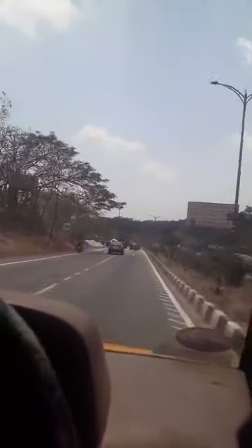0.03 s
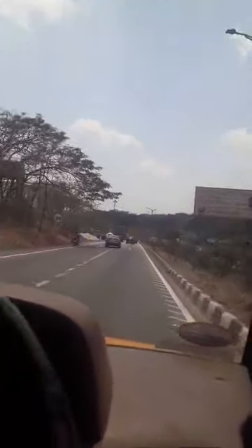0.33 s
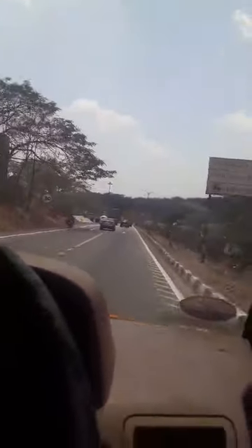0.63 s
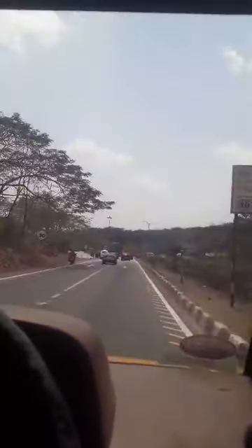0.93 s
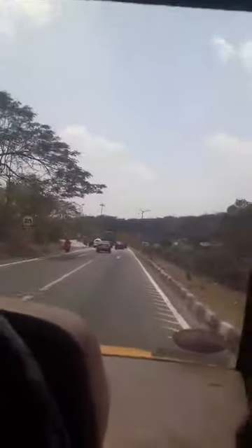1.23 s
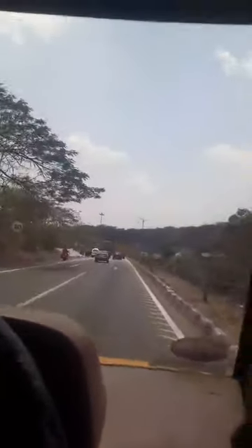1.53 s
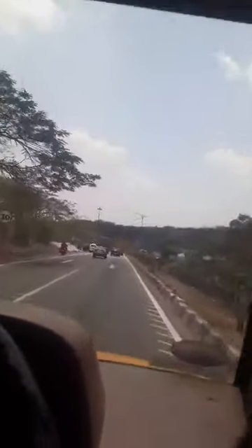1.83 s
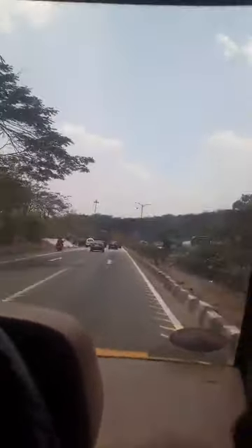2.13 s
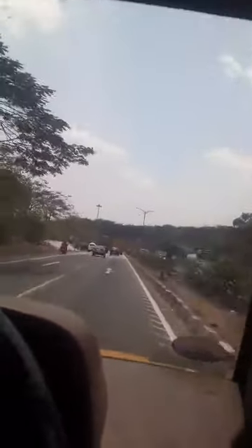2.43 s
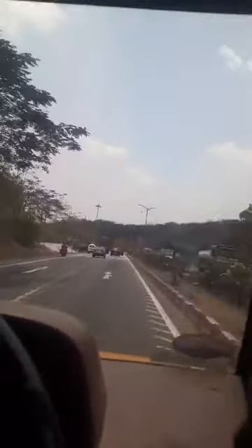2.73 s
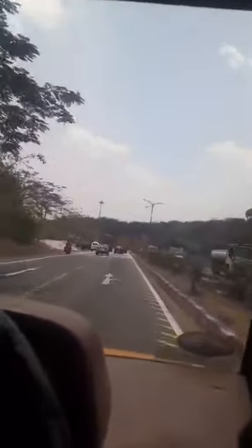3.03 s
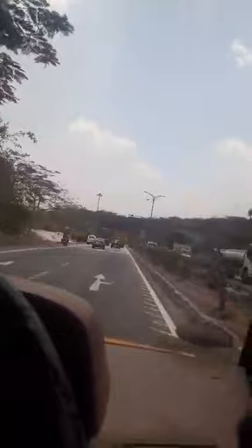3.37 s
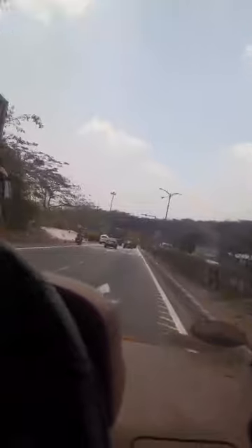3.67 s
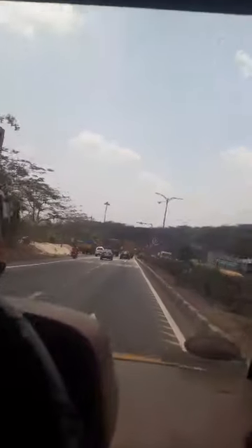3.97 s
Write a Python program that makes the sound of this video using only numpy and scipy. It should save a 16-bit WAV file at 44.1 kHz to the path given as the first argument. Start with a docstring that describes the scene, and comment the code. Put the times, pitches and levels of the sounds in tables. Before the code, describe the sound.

Tyres cross rumble strips in a quick train of thumps and trim rattles, heard from a vehicle's front seat. Steady road roar, engine drone and wind come before and carry on afterwards, a little quieter.

```python
"""Rumble strips from inside a vehicle

Tyre roar, cabin boom, engine drone and wind hiss at road speed. The tyres cross a run of rumble
strips, about 15 a second. Each strip thumps the body and shakes the loose trim into a short
rattle; the trim squeaks now and then and a small metal part rings."""
import sys
import numpy as np
from scipy import signal
from scipy.io import wavfile
from scipy.ndimage import uniform_filter1d

SR = 44100
rng = np.random.default_rng(int(sys.argv[2]) if len(sys.argv) > 2 else 0)


def master(y):
    """Save y as 16-bit WAV."""
    cut = np.clip(np.atleast_2d(y).T, -1, 1)
    pcm = np.round(cut * 32767)  # scale
    wavfile.write(sys.argv[1], SR, pcm.astype(np.int16))


N = 176400


def amp(db):
    """Decibels to gain."""
    return 10 ** (np.asarray(db) / 20)


def unit_rms(x):
    """Scales to rms 1."""
    return x / np.sqrt(np.mean(x ** 2) + 1e-20)


def curve_at(points, hz):
    """Interpolates a table on a log-frequency axis."""
    point_hz, value = np.transpose(points)
    return np.interp(np.log(hz + 1), np.log(point_hz + 1), value)


def resonance_db(modes, hz):
    """Boost from resonant modes at each frequency."""
    return sum(db / (1 + (2 * (hz - mode_hz) / width_hz) ** 2) for mode_hz, width_hz, db in modes)


def since(start_s):
    """Seconds since the start, zero before it."""
    return np.maximum(np.arange(N) / SR - start_s, 0)


def burst(start_s, rise_s, hold_s, t60_s):
    """Linear rise, then exponential decay from hold_s after the start."""
    t = since(start_s)
    return np.minimum(t / rise_s, 1) * np.exp(-np.log(1000) * np.maximum(t - hold_s, 0) / t60_s)


def stereo_gains(balance, hz):
    """Left and right gains of constant total power."""
    gains = amp(np.array([[.5], [-.5]]) * curve_at(balance, hz))
    return gains / np.sqrt(np.mean(gains ** 2, 0))


def colour(x, gain, size=4096):
    """Minimum-phase filter with the given gain per channel and frequency."""
    log_gain = np.log(np.maximum(gain, 1e-5))
    mirrored = np.concatenate([log_gain, log_gain[:, -2:0:-1]], 1)
    taps = np.fft.ifft(np.exp(np.conj(signal.hilbert(mirrored)))).real[:, :size // 2]
    return signal.fftconvolve(x, taps, axes=1)[:, :N]


# Cabin reverberation: freq_hz, t60_s
CABIN_DECAY = [(300, 0.053), (1500, 0.19), (5000, 0.11), (12000, 0.091)]


def cabin(x, size=8192, tail_db=1):
    """Direct sound plus the short, dense reflections of the cabin."""
    hz, t, spectra = signal.stft(rng.standard_normal((2, size)), SR, nperseg=256)
    decay = np.exp(-np.log(1000) * t / curve_at(CABIN_DECAY, hz)[:, None])
    tail = signal.istft(spectra * decay, SR)[1]
    tail *= amp(tail_db) / np.linalg.norm(tail, axis=1, keepdims=True)
    return (x + signal.fftconvolve(x, tail, axes=1)[:, :N]) / np.hypot(1, amp(tail_db))


# Stereo balance of road noise: freq_hz, left_minus_right_db
ROAD_PAN = [(60, 3.5), (150, 8), (270, 3), (450, 7), (1200, 7), (2000, 2), (3300, 0.5), (5500, -7),
            (7200, -2.5), (9000, 13), (15000, 19)]
# Likeness of left and right: freq_hz, correlation
ROAD_COHERENCE = [(60, 0.96), (200, 0.97), (380, 0.65), (700, 0.52), (1300, 0), (2400, 0)]


def stereo_noise_spectra(hz, frames):
    """Random short-time spectra, left and right alike in the bass."""
    a, b, c, d = rng.standard_normal((4, frames, len(hz)))
    left, independent = a + 1j * b, c + 1j * d
    coherence = np.clip(curve_at(ROAD_COHERENCE, hz), -1, 1)
    right = coherence * left + np.sqrt(1 - coherence ** 2) * independent
    return np.array([left, right]) * stereo_gains(ROAD_PAN, hz)[:, None]


# Road noise spectrum: freq_hz, relative_density_db
ROAD_SPECTRUM = [(20, -40), (30, -35), (38, -1.5), (72, -6), (88, -6), (120, 1.5), (155, -9), (183, 0),
                 (202, -4), (238, -1.5), (305, -8.5), (395, -15), (432, -6.5), (495, -17), (600, -11.5),
                 (850, -12.5), (1300, -20), (1650, -23), (2100, -26.5), (3500, -35), (5300, -38),
                 (6500, -47), (8300, -65), (9500, -56), (12000, -40), (15500, -50.5)]
# Band centres: boom_hz, roar_hz, hiss_hz
BAND_CENTRES_HZ = [230, 700, 3500]
# Band gains along the road: time_s, boom_db, roar_db, hiss_db
BAND_GAINS = [(0, 0, -0.5, -0.5), (.3, -2, 0.5, -1), (.47, 3.5, 0, -1), (.6, -2.5, -1, -2),
              (0.999, 0.5, 1.5, -1), (1.25, 1.5, 3.5, 0), (1.5, 5, 3, 6), (2.4, 4.5, 3, 0.5),
              (2.65, -2, -2.5, -7.5), (2.85, -6, -2.5, -6.5), (3.15, -4, -2.5, -5), (3.42, -6, -3.5, -6),
              (3.6, -1, -4, -6.5), (3.9, -3.5, -2.5, -6), (4, -2, -1.5, -5)]


def road_noise(size=8192, level_db=-20.5, patch_db=1.42, flutter_db=0.1):
    """Tyre, engine and wind noise in the cabin's resonances, changing with the road surface."""
    def to_wave(frames):
        return signal.istft(frames.swapaxes(1, 2), nperseg=size, noverlap=size * 3 // 4)[1][:, :N]

    hz = np.fft.rfftfreq(size, 1 / SR)
    frame_s = np.arange(0, N + size, size // 4) / SR
    spectra = stereo_noise_spectra(hz, len(frame_s)) * amp(curve_at(ROAD_SPECTRUM, hz))
    patches = uniform_filter1d(rng.standard_normal(spectra.shape[1:]), size=2, axis=0)
    patches = unit_rms(uniform_filter1d(patches, size=40, axis=1))
    time_s, *bands_db = np.transpose(BAND_GAINS)
    frames_db = np.transpose([np.interp(frame_s, time_s, band) for band in bands_db])
    gain_db = np.array([curve_at(list(zip(BAND_CENTRES_HZ, row)), hz) for row in frames_db])
    roar = to_wave(spectra * amp(gain_db + patch_db * patches)) / to_wave(spectra).std()
    flutter = unit_rms(uniform_filter1d(rng.standard_normal(N), size=900))
    return amp(level_db + flutter_db * flutter) * roar


# Rings of the metal part: start_s, relative_level_db
METAL_RINGS = [(1.518, -31.5), (1.755, -49), (1.855, -40.5), (2.055, -41), (2.210, -39), (2.320, -37.5),
               (2.46, -65)]


def metal_rings(pitch_hz=10670, rise_s=0.0086, t60_s=0.29, right_db=-26):
    """A small metal part is jolted into a thin, high ring."""
    out = np.zeros(N)
    for start_s, level_db in METAL_RINGS:
        tone = np.sin(2 * np.pi * (pitch_hz * since(start_s) + rng.random()))
        out += amp(level_db) * burst(start_s, rise_s, rise_s, t60_s) * tone
    return 2 * out * np.array([[1], [amp(right_db)]])


# Squeaks of the trim: start_s, length_s, pitch_hz, relative_level_db, wobble_ratio
TRIM_SQUEAKS = [(.772, 0.042, 3385, -44, .003), (0.904, 0.054, 3387, -45, .003),
                (1.434, 0.0093, 5640, -20.5, 0.029), (1.644, 0.012, 5560, -23, 0.056),
                (2.570, 0.035, 5820, -43.5, .01)]


def trim_squeaks(octave_db=-20, left_db=-6):
    """Trim slips against trim: brief, unsteady high notes."""
    out = np.zeros(N)
    for start_s, length_s, pitch_hz, level_db, wobble in TRIM_SQUEAKS:
        drift = unit_rms(uniform_filter1d(rng.standard_normal(N), size=20))
        phase = 2 * np.pi * np.cumsum(pitch_hz * (1 + wobble * drift)) / SR
        envelope = np.sin(np.pi * np.minimum(since(start_s) / length_s, 1))
        out += amp(level_db) * envelope * (np.sin(phase) + amp(octave_db) * np.sin(2 * phase))
    return cabin(2 * out * np.array([[amp(left_db)], [1]]))


# Rattle spectrum: freq_hz, relative_density_db
RATTLE_SPECTRUM = [(150, -22), (450, 2), (700, 9.5), (950, 9), (1350, 3), (2000, -3), (2800, -4),
                   (3800, -6.5), (5600, -5.5), (6700, -11.5), (7800, -25), (9200, -18), (11000, -8.5),
                   (12500, -7), (15500, -11)]
# Trim panel modes: freq_hz, width_hz, gain_db
PANEL_MODES = [(658, 15.6, 8.5), (898, 25, 2), (1227, 41, 2.5), (1536, 30, 7.5), (2220, 110, 1.5)]
# Stereo balance of the rattle: freq_hz, left_minus_right_db
RATTLE_PAN = [(600, 4.5), (1100, 7), (1800, 2), (3300, -2), (5500, -6.5), (7000, -6.5), (8800, 10),
              (15000, 15)]
# Rumble strip hits: start_s, rattle_gain_db, thump_gain_db
STRIP_HITS = [(1.128, -29, -6), (1.195, -16, -24), (1.265, -11, -8), (1.333, -4.5, -0.5), (1.411, -5, 0.5),
              (1.490, -2.5, 2), (1.565, 2, 2.5), (1.634, 0, 4), (1.708, 1.5, 3), (1.774, 3, 3),
              (1.835, 0.5, -0.5), (1.905, -2.5, 0), (1.972, 2, 1.5), (2.03, -1, 0.5), (2.1, -2, -3),
              (2.168, 3, 2.5), (2.226, 1.5, 0.5), (2.293, 1, 1.5), (2.361, 2.5, 0.5), (2.427, 0.5, -1),
              (2.488, -4, -8), (2.545, -18, -27)]


def trim_rattles(size=4096, level_db=-16.5, clicks_per_s=3500, spread_db=2.5):
    """Each strip throws the loose trim into a cluster of clicks, then a weak rebound."""
    rebound_s, rebound_db = 0.0448, -13.5
    shake = np.zeros(N)
    for start_s, gain_db, _ in STRIP_HITS:
        for hit_s, hit_db in [(start_s, gain_db), (start_s + rebound_s, gain_db + rebound_db)]:
            shake += amp(hit_db) * burst(hit_s, rise_s=0.0031, hold_s=0.0091, t60_s=0.086)
    contacts = rng.random(N) < clicks_per_s / SR
    strength = amp(spread_db * np.clip(rng.standard_normal(N), -2, 2))
    clicks = unit_rms(contacts * strength * rng.choice([-1, 1], (2, N)))
    hz = np.fft.rfftfreq(size, 1 / SR)
    panels = unit_rms(amp(curve_at(RATTLE_SPECTRUM, hz) + resonance_db(PANEL_MODES, hz)))
    return amp(level_db) * cabin(colour(clicks * shake, panels * stereo_gains(RATTLE_PAN, hz)))


# Spectrum of the strips' boom: freq_hz, relative_density_db
BOOM_SPECTRUM = [(20, -47), (33, -25), (55, -6.5), (88, -9.5), (112, 6.5), (148, -9.5), (206, -8.5),
                 (228, -7), (275, -5), (375, -15.5), (500, -15), (700, -10.5), (1000, -17), (1600, -44),
                 (4000, -64)]
# Body and tyre modes: freq_hz, width_hz, gain_db
BODY_MODES = [(113, 25, 0), (205.4, 10.3, 8), (242.7, 10.6, 0.5), (278.4, 22, 5)]


def body_thumps(size=8192, boom_db=-16.5, knock_db=-23, knock_rise_s=0.0039):
    """Each strip kicks the modes of the tyres and body and raises a boom that lasts into the next."""
    hz, t = np.fft.rfftfreq(size, 1 / SR), np.arange(size) / SR
    body_gain = amp(curve_at(BOOM_SPECTRUM, hz) + resonance_db(BODY_MODES, hz))
    spectra = stereo_noise_spectra(hz, 2 * N // size + 3) * body_gain
    boom = unit_rms(signal.istft(spectra.swapaxes(1, 2), nperseg=size)[1][:, :N])
    boom_power, kicks = np.zeros((2, N))
    for start_s, _, gain_db in STRIP_HITS:
        boom_power += (amp(gain_db) * burst(start_s, rise_s=0.0046, hold_s=0.032, t60_s=0.24)) ** 2
        kick_s = start_s + knock_rise_s * rng.random()
        kicks[round(kick_s * SR)] = amp(gain_db)
    modes = sum(np.exp(-np.pi * width_hz * t) * np.sin(2 * np.pi * mode_hz * t)
                for mode_hz, width_hz, _ in BODY_MODES)
    knock = np.minimum(t / knock_rise_s, 1) * modes
    knocks = signal.fftconvolve(kicks, knock)[:N] * stereo_gains(ROAD_PAN, BODY_MODES[0][0])
    return amp(boom_db) * np.sqrt(boom_power) * boom + amp(knock_db) * knocks


def scene():
    """Everything heard from the front seat."""
    return road_noise() + body_thumps() + trim_rattles() + trim_squeaks() + metal_rings()


def record(dry, fade_in_s=0.004, low_cut_hz=37.4, high_cut_hz=15850, knee=0.65, ceiling=0.96):
    """Cuts the deepest bass, rounds the highest peaks and limits the band."""
    highpass = signal.butter(6, low_cut_hz, "high", fs=SR, output="sos")
    x = signal.sosfilt(highpass, dry * np.minimum(since(0) / fade_in_s, 1))
    headroom, excess = ceiling - knee, np.maximum(abs(x) - knee, 0)
    x = np.clip(x, -knee, knee) + np.sign(x) * headroom * np.tanh(excess / headroom)
    lowpass = signal.firwin(511, high_cut_hz, window=("kaiser", 9), fs=SR)
    return signal.oaconvolve(x, lowpass[None], "same")


dry = scene()
out = record(dry)
master(out)
```